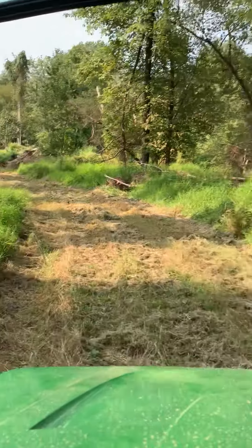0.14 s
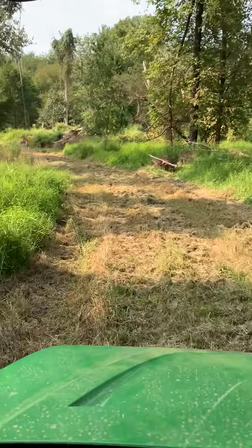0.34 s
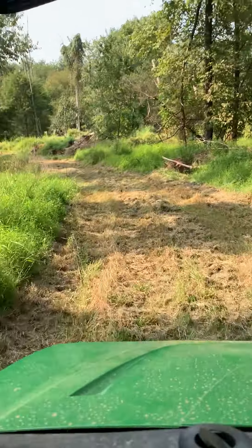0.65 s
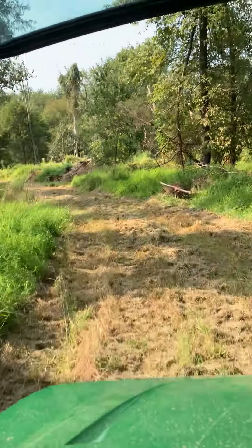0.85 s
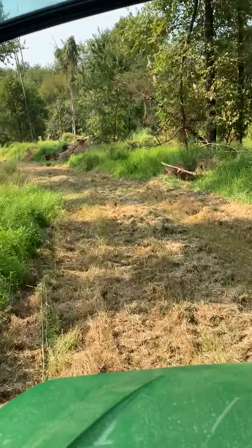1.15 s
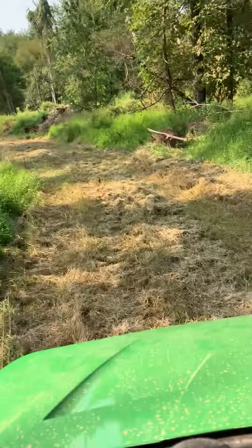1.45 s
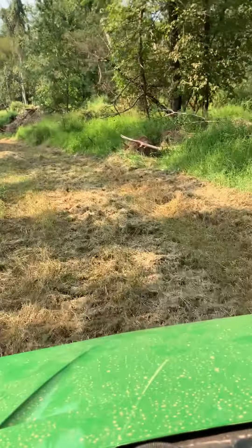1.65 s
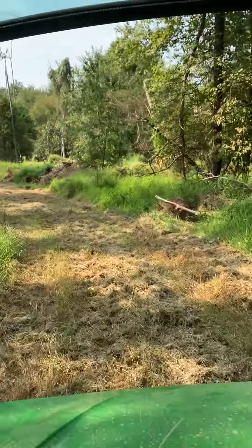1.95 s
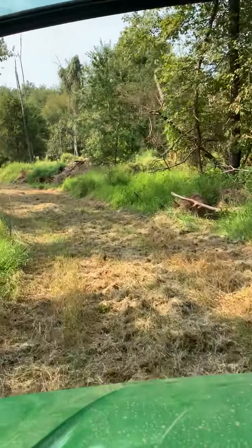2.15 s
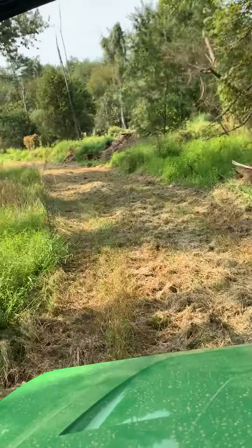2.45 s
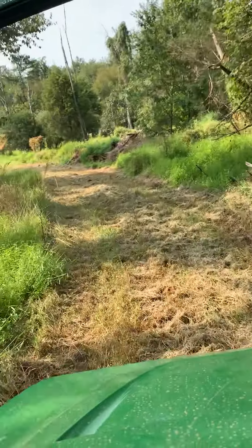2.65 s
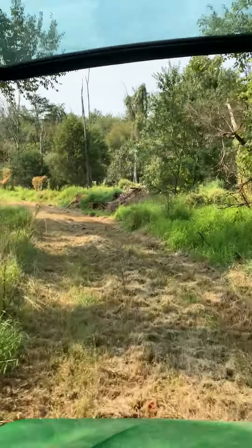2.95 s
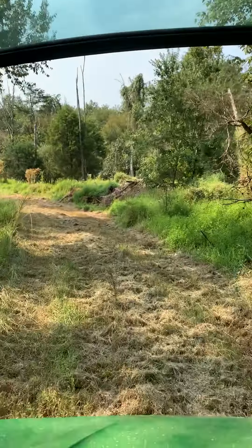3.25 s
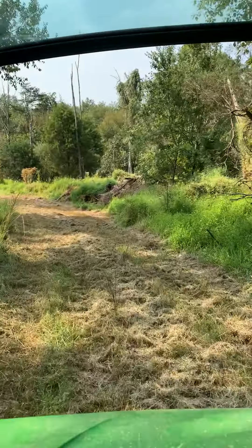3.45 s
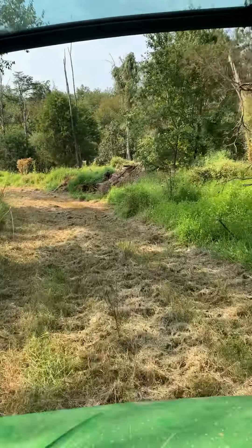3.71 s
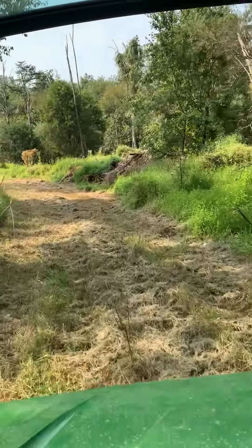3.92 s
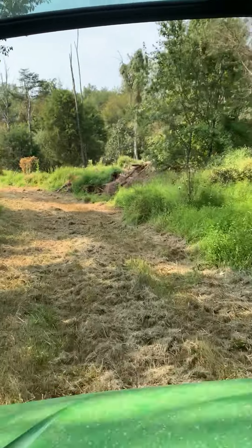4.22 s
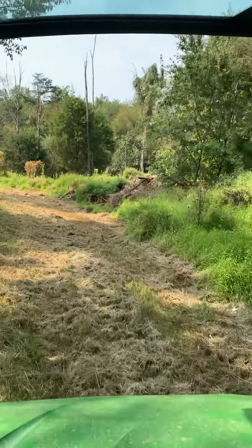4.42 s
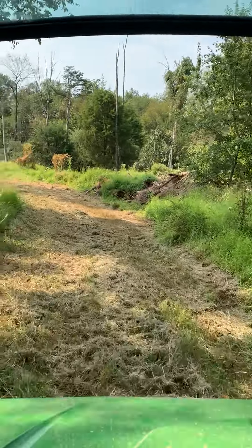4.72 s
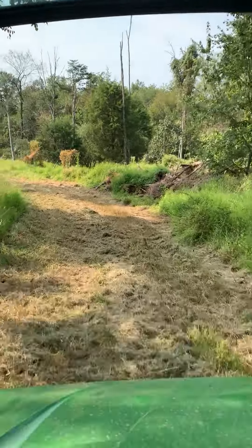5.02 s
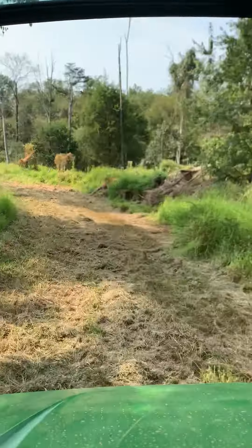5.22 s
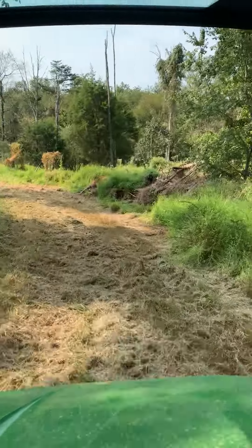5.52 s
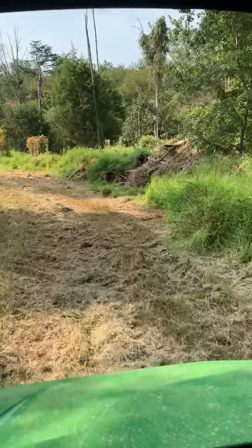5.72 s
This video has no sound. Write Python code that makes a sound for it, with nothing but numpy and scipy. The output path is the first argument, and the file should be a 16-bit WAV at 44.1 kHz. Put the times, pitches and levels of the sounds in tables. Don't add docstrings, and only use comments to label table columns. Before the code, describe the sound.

Inside the open cab of a small utility vehicle rolling over cut grass. A low engine boom sinks gradually in pitch; after a wheel drop at the start, panels rattle and ring in irregular bursts, with knocks and small squeaks. Stalks flick the body and insects trill faintly outside. Close stereo handheld microphone, some handling clicks.

```python
import sys
import numpy as np
from scipy import signal
from scipy.fft import rfft, irfft, next_fast_len
from scipy.io import wavfile
from scipy.ndimage import uniform_filter1d

SR = 44100
rng = np.random.default_rng(int(sys.argv[2]) if len(sys.argv) > 2 else 0)


def int16_out(signal):
    q = np.round(np.clip(np.atleast_2d(signal).T, -1, 1) * 32767)
    wavfile.write(sys.argv[1], SR, q.astype(np.int16))


def magnitude_from_level(level_db):
    exponent = np.asarray(level_db, float) / 20
    return 10 ** exponent


N = 258867


def rms_one(x):
    return x / np.sqrt(np.mean(x ** 2) + 1e-20)


def in_time(rows):
    s, *columns = np.transpose(rows)
    return [np.interp(np.arange(N) / SR, s, c) for c in columns]


def at_hz(points, hz):
    table = np.array(points)
    return np.interp(np.log(hz), np.log(table[:, 0]), table[:, 1])


def drift(rate):
    r = np.exp(-80 * np.pi * rate / SR)
    slow = signal.lfilter([1], [1, -2 * r, r * r], rng.standard_normal(N // 40 + 2002))
    slow = slow[2000:]
    return np.interp(np.arange(N) / 40, np.arange(len(slow)), rms_one(slow))


def band(x, low_hz, high_hz):
    edges = [low_hz, min(high_hz, .47 * SR)]
    return signal.sosfilt(signal.butter(2, edges, "band", fs=SR, output="sos"), x)


# f/Hz, likeness [0 to 1]
LIKENESS = [(100, 1.0), (330, 0.86), (500, 0.91), (800, 0.47), (1200, 0.59), (2000, 0.55), (3000, 0.12),
            (4200, 1), (5000, 0.88), (9000, 0.87), (16000, 1)]


def stereo(mid, side, hz):
    alike = np.clip(at_hz(LIKENESS, hz), 0, 1)
    common = np.array([1, 1])[:, None] * np.sqrt(1 + alike) * mid
    return common + np.sqrt(1 - alike) * side * [[1], [-1]]


def banded_noise(spectrum, together, patchy_db, rate, count=3):
    low_hz, high_hz = spectrum[0][0], spectrum[-1][0]
    edges = low_hz * 2 ** np.arange(0, np.log2(high_hz / low_hz) + 1 / count, 1 / count)
    out, white = 0, rng.standard_normal((2, 2, N))
    for k, (low, high) in enumerate(zip(edges, edges[1:])):
        hz = np.sqrt(low * high)
        gain = magnitude_from_level(at_hz(spectrum, hz) + patchy_db * drift(rate))
        out = out + gain * stereo(*band(white[k % 2], low, high), hz)
    return rms_one(out * magnitude_from_level(together))


def bursts(rows, offset_db, rise):
    out = np.zeros(N)
    for s, db, t60 in rows:
        i = round(s * SR)
        t = np.arange(min(N - i, int(t60 * SR))) / SR
        out[i:i + len(t)] += magnitude_from_level(db + offset_db - 60 * t / t60) * (1 - np.exp(-t / rise))
    return out


# t/s, firing f/Hz, firing level/dB
ENGINE = [(0.0, 83.7, -15.5), (0.12, 82.86, -10.5), (0.32, 79.84, -9.5), (0.52, 78.14, -8.5),
          (0.92, 75.7, -9.5), (1.2, 74.5, -9.5), (1.72, 73.4, -9.5), (2.12, 72.5, -11),
          (2.72, 72.64, -10.5), (2.92, 73.03, -10.5), (3.32, 72.5, -9.5), (3.6, 72.37, -8.7),
          (4.32, 69.76, -9), (4.6, 69.38, -9.5), (5.0, 67.68, -10), (5.35, 68.15, -10.5), (5.87, 67.5, -10)]
# order, rms level/dB
WEAK_ORDERS = [(2, -40.5), (8, -42), (10, -55), (14, -60.5), (15, -50.5), (20, -54)]
# order, level/dB, coasting loss/dB, side level/dB, swell/dB
OVERTONES = [(4, 0.5, -4.5, -25, -0.7), (5, -6, 1.5, -22.5, 6), (6, 1.5, 11.5, -18.5, 1.5),
             (7, -1.2, 1.5, -26, 1.6), (9, 0.87, 23.5, -19.5, 0.9), (12, -1.7, 12.0, -14.5, 3.5)]
# f/Hz, rms level/dB
CAB = [(95, -38), (112, -30.5), (128, -40.5), (174, -27.5), (193, -34), (204, -29.5), (270, -44),
       (295, -40.5)]
# from t/s, to t/s
PULLING = [
    (.42, 3.42),
    (4.44, 6.5),
]


def engine():
    t, (hz, firing_db) = np.arange(N) / SR, in_time(ENGINE)
    cycle = 2 * np.pi * np.cumsum(hz / 3) / SR
    coasting, take_up_s = np.ones(N), .05
    for start, end in PULLING:
        coasting -= (np.tanh((t - start) / take_up_s) - np.tanh((t - end) / take_up_s)) / 2
    orders = [(3, firing_db, -32.5, 0.066)]
    orders += [(k, db, -24, 3.0) for k, db in WEAK_ORDERS]
    for k, db, loss_db, side_db, swell_db in OVERTONES:
        orders.append((k, db + at_hz(CAB, k * hz / 3) - loss_db * coasting, side_db, swell_db))
    out = np.zeros((2, N))
    for order, db, side_db, swell_db in orders:
        phase = order * (cycle + .012 * drift(2)) + rng.uniform(0, 2 * np.pi)
        height = np.sqrt(2) * magnitude_from_level(db + swell_db * drift(1.55))
        out += height * (np.sin(phase) + magnitude_from_level(side_db) * np.sin(phase + 0.68) * [[1], [-1]])
    return out


# f/Hz, level per Hz/dB
RUMBLE = [(14, -33.5), (22, -6.5), (32, -22), (45, 2), (60, 6), (100, -15.5), (160, 3.5), (210, -13),
          (280, -22), (400, -47)]


def rumble():
    return magnitude_from_level(-26.5) * banded_noise(RUMBLE, 1.3 * drift(2.7), patchy_db=-1.5, rate=3.2, count=2)


# t/s, peak level/dB
RATTLES = [(0.0543, -36), (0.148, -34), (0.3328, -29.5), (0.564, -33), (1.1555, -23), (1.3125, -30),
           (1.6446, -30), (1.7085, -29), (1.8444, -26), (2.0554, -21), (2.495, -37.5), (2.543, -25.5),
           (2.6536, -24.5), (2.7033, -23.5), (2.871, -24), (3.03, -29.5), (3.414, -30), (3.8457, -26),
           (3.906, -23), (4.069, -23.5), (4.3753, -24), (4.4203, -40), (4.4507, -25.5), (4.798, -18),
           (4.8962, -18), (4.94, -20), (5.0717, -18.5), (5.2695, -29), (5.43, -25), (5.811, -35)]


def shaking():
    bump_s, share = 0.05, .85
    t, power = np.arange(0, N, 64) / SR, 0
    for s, db in RATTLES:
        power = power + magnitude_from_level(db) * np.exp(-((t - s - bump_s / 2) / bump_s) ** 2)
    swells = np.sqrt(power)
    swells = np.interp(np.arange(N) / SR, t, rms_one(swells - swells.mean()))
    return share * swells + np.sqrt(1 - share ** 2) * drift(7.2)


# f/Hz, level per Hz/dB
PANELS = [(180, -25.5), (280, -5), (350, 4), (500, -2.5), (800, 0), (1100, -4), (1400, -12.5), (2000, -39)]
# t/s, level/dB
RIDE = [(0.0, -3), (.15, 2.5), (.5, 2), (.8, 0.5), (1.15, 0.1), (1.5, -1), (1.9, 1.1), (2.3, 2.8),
        (2.62, 1), (3.1, 0.5), (3.5, 1.2), (3.7, -1.5), (4.2, -1), (4.55, 2.2), (4.75, -0.5), (4.9, -0.5),
        (5.25, -1), (5.87, 1.3)]


def panels(bumps):
    (rough_db,) = in_time(RIDE)
    return magnitude_from_level(-36 + 0.82 * rough_db) * banded_noise(PANELS, 1.94 * bumps, patchy_db=2.0, rate=12.7)


# f/Hz, level/dB, t60/s
PANEL_MODES = [(478.6, -1, 0.11), (648.6, -5, 0.13), (1073, -4, 0.08), (1183, -8, 0.12),
               (1390, -6.5, 0.099), (1670, -10.5, 0.024), (2085, -9, 0.06), (2430, -13, 0.09),
               (2764, -12.5, 0.05), (3170, -14, 0.06), (3740, -20, 0.05), (4050, -20, 0.08),
               (5170, -25, 0.06), (6320, -15, 0.08)]


def ringing_panels(bumps):
    sizes = magnitude_from_level(4.2 * np.minimum(rng.exponential(1, N), 2.8)) * rng.choice([-1, 1], N)
    taps = sizes * (rng.random(N) < 500.0 * magnitude_from_level(3.0 * bumps) / SR)
    dealt, sides, out = rng.integers(0, len(PANEL_MODES), N), rng.uniform(-0.99, 1, N), 0
    for k, (hz, db, t60) in enumerate(PANEL_MODES):
        r, w = magnitude_from_level(-60 / (t60 * SR)), 2 * np.pi * hz / SR
        own = taps * (dealt == k) + 1e-18
        strikes = [own, 2.5 * own * sides]
        mid, side = signal.lfilter([0, magnitude_from_level(db) * np.sin(w)], [1, -2 * r * np.cos(w), r * r], strikes)
        out = out + stereo(mid, side, hz)
    return rms_one(out)


# f/Hz, level per Hz/dB
CLATTER = [(700, -28), (1200, -4), (1600, 1.5), (2300, -4), (3200, -6.5), (4300, -8), (5600, -17.5),
           (7000, -15.5), (9000, -27.5)]


def clatter(bumps):
    (rough_db,) = in_time(RIDE)
    level_db = -37.5 + rough_db
    noise = banded_noise(CLATTER, 1.14 * bumps + 1.15 * drift(40), patchy_db=3.0, rate=18.0)
    rattles = bursts([(s, db, 0.056) for s, db in RATTLES], offset_db=-6.0, rise=0.0046)
    return noise * (magnitude_from_level(level_db - 4.0) + rattles) + magnitude_from_level(level_db - 3.0) * ringing_panels(bumps)


# t/s, peak level/dB, f/Hz, side level/dB
KNOCKS = [(.066, -13, 700, -14), (.078, -14, 480, -14), (.092, -17, 620, -14), (.145, -20, 450, -14),
          (.924, -16, 720, -11), (.935, -11, 470, -13), (1.675, -19, 760, -11), (1.842, -17, 520, -11),
          (2.241, -23, 400, -13), (2.796, -21, 480, -11), (3.035, -14.5, 520, -11), (4.55, -24, 480, -13),
          (5.436, -18, 430, -11)]


def knocks():
    out, t = np.zeros((2, N)), np.arange(9000) / SR
    for s, db, hz, side_db in KNOCKS:
        i = round(s * SR)
        modes = np.sin(2 * np.pi * hz * t) + 1.02 * np.sin(2 * np.pi * .74 * hz * t)
        ring = magnitude_from_level(7.0 - 60 * t / 0.047) * (1 - np.exp(-t / 0.0076)) * modes
        crack = magnitude_from_level(6.0 - 60 * t / 0.022) * band(rng.standard_normal(len(t)), 390, 1300)
        blow = magnitude_from_level(db - 4.5) * (1 - np.exp(-t / 0.0022)) * (ring + crack)
        out[:, i:i + len(t)] += blow * (1 + magnitude_from_level(side_db) * np.array([[1], [-1]]))
    return out


# t/s, peak level/dB, f/Hz, t60/s
THUDS = [
    (.072, -17, 145, .3),
    (.066, -21, 258, .12),
    (.115, -25, 240, .3),
    (.3, -22, 163, .25),
]


def thuds():
    out, t = np.zeros(N), np.arange(9000) / SR
    for s, db, hz, t60 in THUDS:
        i = round(s * SR)
        decay = magnitude_from_level(db - 60 * t / t60) * (1 - np.exp(-t / 0.0032))
        out[i:i + len(t)] += decay * np.sin(2 * np.pi * hz * t)
    return out


# t/s, peak level/dB
TICKS = [
    (.946, -23),
    (1.043, -34.5),
    (1.278, -14),
    (1.573, -28),
    (1.753, -29),
    (3.427, -18),
    (5.398, -27),
    (5.669, -25),
]


def ticks():
    clicks = np.zeros(N)
    for s, db in TICKS:
        clicks[round(s * SR)] = magnitude_from_level(db + 10.0)
    low = band(clicks, 350, 1300) + magnitude_from_level(-8.0) * band(clicks, 1300, 5000)
    return low * [[1.15], [-.85]]


# t/s, length/s, f/Hz, level/dB
SQUEAKS = [(0.144, 0.057, 11498, -41), (0.417, 0.048, 6330, -51), (0.739, 0.045, 5124, -49),
           (0.887, 0.054, 6373, -47), (0.899, 0.042, 3660, -40), (1.0, 0.03, 2780, -42),
           (1.224, 0.068, 12360, -44), (1.529, 0.025, 4091, -45), (1.41, 0.025, 2700, -44),
           (1.86, 0.042, 11498, -51), (1.883, 0.054, 5081, -45), (1.9, 0.135, 12532, -43),
           (1.976, 0.057, 11455, -49), (2.252, 0.015, 4048, -45), (2.49, 0.03, 11480, -53),
           (2.704, 0.054, 2067, -36), (2.713, 0.036, 6158, -49), (2.719, 0.042, 4134, -47),
           (0.641, 0.025, 6287, -53), (2.855, 0.062, 5124, -46), (3.006, 0.042, 4306, -48),
           (4.777, 0.022, 6287, -47), (5.111, 0.106, 11843, -48), (5.291, 0.025, 6287, -53),
           (5.6, 0.048, 6330, -48), (5.682, 0.015, 7536, -46), (5.752, 0.045, 12360, -47),
           (5.81, 0.03, 1378, -37)]
# t/s, level/dB
HINGE = [
    (.571, -55),
    (1.575, -52),
    (1.784, -45),
    (2.347, -51),
    (2.829, -43),
    (3.622, -52),
    (5.285, -46),
    (5.671, -50),
]


def squeaks():
    out, flutter, waver = np.zeros(N), magnitude_from_level(2.5 * drift(90)), drift(70)
    chirps = [(s, .033, 8950, db) for s, db in HINGE]
    for s, length, hz, db in SQUEAKS + chirps:
        i, n = round(s * SR), int(length * SR)
        tone = np.sin(2 * np.pi * hz * np.arange(n) / SR + 1.6 * waver[i:i + n])
        gap = 1 - .85 * (.05 < length < .065) * np.hanning(n) ** 12
        out[i:i + n] += magnitude_from_level(db + 4.0) * np.hanning(n) ** .5 * gap * tone
    return out * flutter


# t/s, peak level/dB, t60/s
BRUSHES = [(.0867, -37, 0.073), (.111, -33.5, 0.054), (.71, -37.5, .04), (1.318, -33.5, .04),
           (1.345, -34.5, 0.076), (1.46, -39, 0.064), (1.671, -37, 0.094), (2.137, -32.5, .03),
           (2.6, -42, 0.028), (4.49, -39, 0.18), (4.797, -39.5, .14), (4.895, -36.5, 0.11),
           (4.91, -30.5, 0.14), (4.94, -45.5, 0.46), (5.27, -42.5, 0.059), (5.706, -37.5, .1)]


def brushes():
    return band(rng.standard_normal(N), 1500, 17000) * bursts(BRUSHES, offset_db=1.3, rise=0.00058)


# t/s, rms level/dB
PUFFS = [(.65, -49), (1.148, -47.5), (1.35, -43), (1.53, -44.5), (1.87, -44.5), (2.655, -49.5),
         (2.77, -44.5), (3.91, -48), (4.799, -45), (4.93, -54), (4.975, -45), (5.86, -47)]


def puffs():
    t, swell = np.arange(N) / SR, np.zeros(N)
    for s, db in PUFFS:
        swell += magnitude_from_level(db) * np.exp(-((t - s) / 0.028) ** 2)
    return swell * rms_one(band(rng.standard_normal(N), 5700, 7400))


# f/Hz, level per Hz/dB
GRASS = [(5000, -17.5), (8000, -0.5), (9500, -3), (11000, -9.5), (13000, -4.5), (15500, 3.5), (18000, -1)]
# t/s, level/dB
TALL_GRASS = [(0.0, -51), (1.4, -51), (2.2, -54.5), (2.4, -57.5), (3.7, -55), (3.95, -52.5), (4.25, -54.5),
              (4.6, -53.5), (5.87, -52.5)]


def grass(bumps):
    (grass_db,) = in_time(TALL_GRASS)
    hiss = banded_noise(GRASS, .5 * bumps, patchy_db=2.8, rate=12.0, count=2)
    return hiss * magnitude_from_level(grass_db + 4.0)


# f/Hz, pulse rate/Hz, width/Hz, level abreast/dB
SINGERS = [
    (8150, 29.6, 420, -44.5),
    (8060, 24, 380, -46),
    (8580, 32.5, 470, -42),
    (7470, 30, 580, -49.5),
]
# abreast t/s, distance from the track/s of driving, left lean/dB
PASSING = [
    (2.67, 1, 0.5),
    (4.3, .25, .3),
    (5.8, .5, 1.5),
    (5.75, .2, 0),
]


def insects():
    t = np.arange(N) / SR
    far = rms_one(band(band(rng.standard_normal(N), 7130, 8940), 6720, 8200))
    steady = rms_one(band(rng.standard_normal(N), 7950, 8450))
    out = magnitude_from_level(-48.5 + 1.7 * drift(17)) * (far + magnitude_from_level(-3.0) * steady)
    for (hz, per_s, width_hz, db), (abreast, away, lean_db) in zip(SINGERS, PASSING):
        stroke = 2 * np.pi * per_s * t + .5 * drift(1.5)
        gate = (.5 + .5 * np.sin(stroke)) ** 2.2 * magnitude_from_level(1.5 * drift(4))
        rasp = rms_one(band(rng.standard_normal(N), hz - width_hz / 2, hz + width_hz / 2))
        glide = .4 * width_hz / per_s * np.sin(stroke)
        voice = rasp + 1.1 * np.sin(2 * np.pi * hz * t + glide + 3 * drift(40))
        level = magnitude_from_level(db + lean_db * np.array([[.5], [-.5]]))
        screening = 1 + ((t - abreast) / away) ** 2
        out = out + level / screening * rms_one(gate * voice)
    return out


def scene():
    bumps = shaking()
    body = rumble() + panels(bumps) + clatter(bumps) + knocks() + thuds() + ticks() + squeaks()
    return engine() + body + brushes() + puffs() + grass(bumps) + insects()


# f/Hz, phase lag/turns
PORT_LAG = [(0, 0), (900, 0), (4750, .5), (6700, 1.0), (9000, 1.5), (15250, 3.0), (22050, 4.6)]


def lag_right_port(x):
    size = next_fast_len(N + 4096)
    turns = np.interp(np.arange(size // 2 + 1) * SR / size, *np.transpose(PORT_LAG))
    return irfft(rfft(x, size) * np.exp(-2j * np.pi * turns), size)[:N]


def drop_weak_bands(left, right, below_db, treble_db):
    spec = signal.stft([left + right, left - right], nperseg=2048)[2] / 2
    power = (abs(spec[:, :1024]) ** 2).reshape(2, 64, 16, -1).sum(axis=2)
    power = uniform_filter1d(power, size=2, axis=2)
    margin_db = below_db + treble_db * np.arange(64)[:, None] / 46
    keep = power > power[::-1] * magnitude_from_level(2 * margin_db)
    keep[:, :11] = True
    spec[:, :1024] *= np.repeat(keep, 16, axis=1)
    mid, side = signal.istft(spec, nperseg=2048)[1][:, :N]
    return np.array([mid + side, mid - side])


def band_limit(x):
    return signal.sosfilt(signal.butter(12, 15850, fs=SR, output="sos"), x)


def record(dry):
    mix = drop_weak_bands(dry[0], lag_right_port(dry[1]), below_db=-12.5, treble_db=9.0)
    return band_limit(mix)


dry = scene()
out = record(dry)
int16_out(out)
```